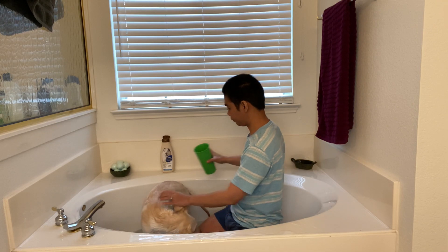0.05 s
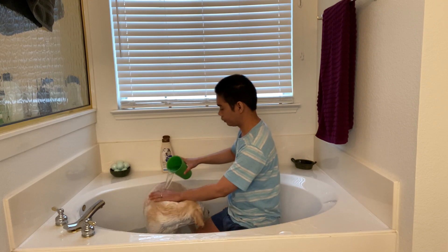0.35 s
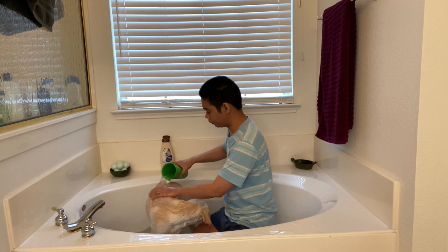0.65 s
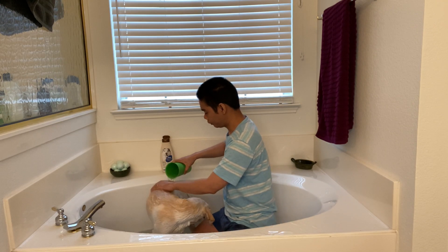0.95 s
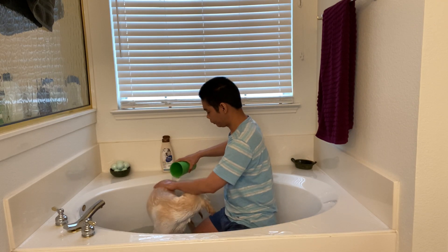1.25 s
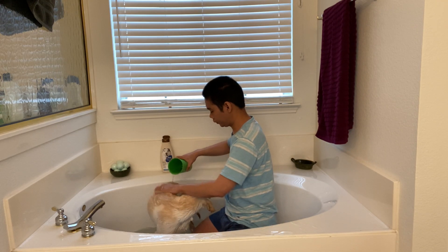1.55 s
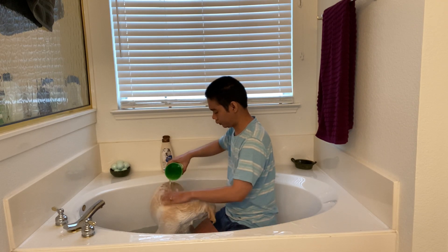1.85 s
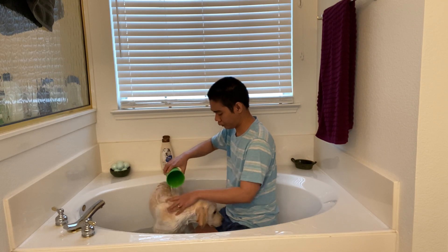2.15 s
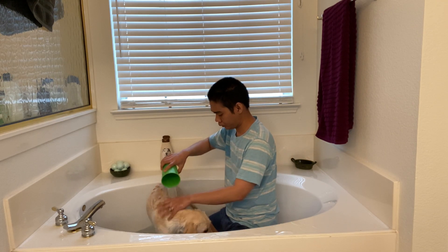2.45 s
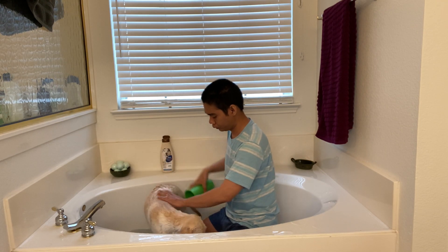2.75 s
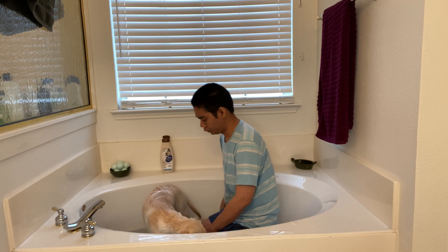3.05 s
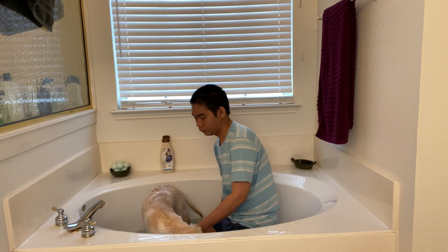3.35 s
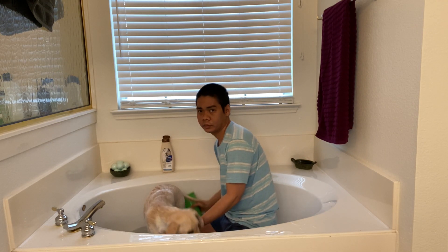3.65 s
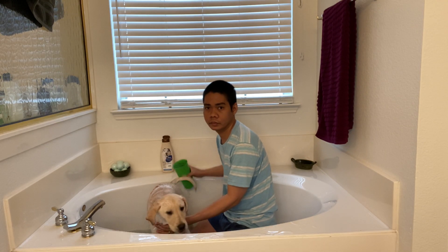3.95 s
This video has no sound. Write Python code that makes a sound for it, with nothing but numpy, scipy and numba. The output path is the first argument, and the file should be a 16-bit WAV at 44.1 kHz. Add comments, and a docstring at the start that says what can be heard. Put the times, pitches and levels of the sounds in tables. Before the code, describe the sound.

Water splashes off a dog and drips into a bathtub as a cup is emptied, then sloshes and gurgles as the cup is refilled. The hollow tub booms softly a few times, and the small bathroom echoes.

```python
"""In a small, hard-walled bathroom, a cup of water is poured over a dog in the tub.
Spray patters on the coat as tiny ticks, and the run-off drips into shallow water, where
trapped air rings as bubbles: the bigger the bubble, the lower its note. The hollow tub booms
softly when bumped. Later the cup is dipped in, gulps air and sloshes.
The walls echo the water sounds."""
import sys
import numpy as np
from scipy import signal
from scipy.fft import rfft, irfft
from scipy.io import wavfile
from numba import njit

SR = 44100
rng = np.random.default_rng(int(sys.argv[2]) if len(sys.argv) > 2 else 0)


def unload_audio(sound):
    """Save the sound as a 16-bit wav file, at the path given as the first command line argument."""
    columns = np.transpose(np.atleast_2d(sound))
    # keep every value between -1 and 1, then stretch to whole-number steps
    steps = np.round(np.clip(columns, -1, 1) * 32767)
    wavfile.write(sys.argv[1], SR, steps.astype(np.int16))


N = 176400


def undb(db):
    return 10 ** (np.asarray(db) / 20)


def unit_rms(x):
    return x / np.sqrt(np.mean(x ** 2) + 1e-20)


def follow(curve):
    """Loudness over time, from rows of t/s, level/dB."""
    return undb(np.interp(np.arange(N) / SR, *np.array(curve).T))


def at_pitch(hz, points):
    """Read between the rows of a table, on a musical (log) pitch scale."""
    p = np.array(points, float)
    return np.interp(np.log(hz + 1), np.log(p[:, 0]), p[:, 1])


def colour(x, points):
    """Shape a sound's bass and treble, then set its average strength to 1."""
    hz = np.arange(N // 2 + 1) * SR / N
    return unit_rms(irfft(rfft(x) * undb(at_pitch(hz, points)), N))


def add(out, start_s, x):
    """Mix a sound in at its start time."""
    i = int(np.clip(start_s * SR, 0, N - 1))
    out[i:i + len(x)] += x[:N - i]


# Spray as pouring starts, as the coat drains and as the cup dips: t/s, relative level/dB
SPRAY_POUR = [(0, -105), (.16, -62), (.168, -59), (.24, -68.5), (.402, -66.5), (.412, -48.5), (.54, -51),
              (.6, -52), (.66, -52.5), (.775, -62.5), (.786, -45.5), (.85, -44.5), (1.0, -47.5),
              (1.068, -58), (1.08, -45), (1.2, -46), (1.3, -54), (1.39, -54.5)]
SPRAY_DRAIN = [(1.4, -56), (1.44, -40.5), (1.63, -52), (1.65, -45.5), (1.98, -55.5), (2.266, -53.5),
               (2.296, -50), (2.388, -52.5), (2.602, -44.5), (2.72, -51.5)]
SPRAY_DIP = [(2.73, -45), (2.75, -37.5), (2.832, -39.5), (3.008, -58), (3.118, -43.5), (3.178, -52),
             (3.324, -50.5), (3.412, -42.5), (4.0, -49.5)]

def spray(spots=3, gain_db=-2):
    """The spray wanders between a few spots, each with its own echoes, so its tone keeps changing."""
    curve = list(SPRAY_POUR) + SPRAY_DRAIN + SPRAY_DIP
    flow = spurts(depth_db=1.5) * follow(curve) * undb(gain_db)
    shares = np.array([spurts(depth_db=5) for _ in range(spots)])
    shares /= np.linalg.norm(shares, axis=0)
    return sum(bathroom(patter() * flow * share) for share in shares)


# Tone of the spray, from low to high: f/Hz, relative level/dB
SPRAY_TONE = [(200, 0.5), (700, -14), (1500, 4.5), (2600, 3.5), (4200, 4.5), (5700, 6), (6500, 7.5),
              (7200, 5), (9000, 2.5), (11500, -7), (14500, -5)]

def patter(count=3000, scatter_db=5.5, mist_db=-10):
    """Droplets tick on one spot of coat or water, over the hiss of a fine mist."""
    when, side, chance = rng.random((count, 3)).T
    size = undb(scatter_db * np.minimum(-np.log(chance), 3.6))  # many soft, a few loud
    ticks = np.bincount((when * N).astype(int), np.sign(side - .5) * size, N)
    return colour(unit_rms(ticks) + undb(mist_db) * rng.standard_normal(N), SPRAY_TONE)


def spurts(depth_db, per_s=45):
    """Water comes in uneven spurts, so its loudness wanders quickly."""
    steps = rng.standard_normal(1000)
    return undb(depth_db * np.interp(np.arange(N) / SR * per_s, np.arange(len(steps)), steps))


@njit
def bubbles(start_s, hz, decay_s, size, length, glide=0.036):
    """Each bubble rings as a fading pure note whose pitch rises as it nears the surface."""
    out = np.zeros(length)
    for k in range(len(hz)):
        first, decay_samples = int(start_s[k] * SR), decay_s[k] * SR
        angle = 2 * np.pi * hz[k] / SR
        wave = size[k] + 0j
        step = np.exp(1j * angle - 1 / decay_samples)  # swings and fades the wave
        bend = np.exp(1j * angle * glide / decay_samples)  # nudges the pitch up
        for i in range(max(first, 0), min(length, first + int(6 * decay_samples))):
            out[i] += wave.imag
            wave *= step
            step *= bend
    return out


# Splashes in the bath: t/s, rise/s, decay/s, middle f/Hz, spread/octaves, relative level/dB
SPLASHES = [(0.411, 0.11, 0.073, 1600, 1.01, -56), (.63, 0.048, 0.087, 803, 0.83, -53.5),
            (.783, 0.0056, 0.063, 4000, 0.53, -52.5), (.8, 0.026, 0.15, 735, 0.47, -55),
            (.81, 0.059, 0.054, 2855, 0.13, -48.5), (1.078, 0.0059, 0.078, 3160, 0.17, -46.5),
            (1.106, 0.0028, .13, 1400, .2, -47.5), (1.18, 0.014, 0.039, 2810, 0.23, -43),
            (1.428, .015, 0.032, 4650, 0.22, -38.5), (1.448, 0.023, 0.083, 1704, 0.49, -38),
            (1.414, .11, 0.13, 300, 0.32, -36.5), (1.62, 0.073, 0.19, 2160, 0.57, -48),
            (1.53, 0.022, .2, 547, 0.39, -42.5), (1.875, 0.01, 0.092, 1140, 0.28, -42.5),
            (2.165, 0.0072, 0.023, 1300, 0.16, -42), (2.2, 0.09, 0.12, 1058, 0.28, -48),
            (2.468, 0.019, 0.072, 2580, 0.58, -44.5), (2.589, 0.021, 0.032, 2210, 0.72, -41.5),
            (2.786, 0.024, 0.06, 2430, 0.45, -35.5), (2.75, 0.078, 0.076, 224, 0.7, -47.5),
            (2.82, 0.017, 0.2, 800, 0.26, -46), (3.06, 0.031, 0.044, 3700, 0.27, -47),
            (3.217, 0.0055, 0.072, 775, 0.55, -39), (3.218, 0.0085, 0.082, 247.4, 0.47, -23.5),
            (3.372, 0.022, 0.069, 209, 0.46, -21.5), (3.37, 0.03, 0.07, 578, 0.45, -27.5),
            (3.375, 0.03, 0.078, 2840, 0.59, -41.5), (3.553, 0.012, 0.066, 204, 0.53, -26),
            (3.554, .08, 0.088, 387, 0.38, -27), (3.553, .025, .11, 780, 0.5, -32),
            (3.565, 0.027, .07, 2120, 0.202, -40.5), (3.88, 0.062, 0.17, 1139, 0.31, -43),
            (3.86, 0.042, 0.14, 427, 0.43, -44)]

def splashes(fewest=40, per_octave=260, scatter_db=5, cycles_at_1khz=4.2):
    """Each splash is a cloud of bubbles that swells and dies away; narrow clouds hold few and gurgle."""
    out = np.zeros(N)
    for start, rise, decay, middle_hz, spread, db in SPLASHES:
        count = int(fewest + per_octave * spread)
        jitter = rng.random(1000)[:count]
        pitch, strength = rng.standard_normal((1000, 2))[:count].T
        when = (np.arange(count) + jitter) / count * (rise + 4 * decay)
        hz = np.minimum(middle_hz * 2 ** (spread * pitch), SR / 3)
        swell = np.minimum(when / rise, np.exp((rise - when) / decay))
        size = undb(scatter_db * np.clip(strength, -2, 1.2)) * swell
        cycles = cycles_at_1khz * np.sqrt(hz / 1000)  # big bubbles ring for fewer cycles
        cloud = bubbles(when, hz, cycles / hz, size, SR)
        add(out, start, unit_rms(cloud) * np.sqrt((rise + decay) / 2) * undb(db))
    return out


# Big pockets of air: t/s, f/Hz, relative level/dB, decay/s
AIR_POCKETS = [(1.529, 293, -24, 0.0074), (1.595, 331, -32.5, 0.016), (1.547, 261, -17, 0.012),
               (1.642, 273, -27.5, .01), (3.181, 354, -30, 0.014), (3.196, 271.2, -23.5, 0.048),
               (3.223, 266.3, -12.5, 0.018), (3.295, 296, -30.5, 0.022), (3.388, 170, -14, 0.021),
               (3.465, 205, -21, 0.016), (3.622, 367, -18.5, 0.021), (3.655, 423.4, -23.5, 0.026),
               (3.705, 353, -24.5, 0.023), (3.77, 394, -26.5, 0.018)]

def gulps(rise_s=0.0041, glide=0.0394):
    """Air collapses under the stream or escapes from the cup with a short, low, rising note."""
    out, t = np.zeros(N), np.arange(SR // 3) / SR
    for start, hz, db, decay in AIR_POCKETS:
        note = np.sin(2 * np.pi * hz * t * (1 + glide * t / decay / 2))
        swell = (1 - np.exp(-t / rise_s)) * np.exp(-t / decay)
        add(out, start, undb(db) * note * swell)
    return out


# Water hitting cup and tub: t/s, middle f/Hz, relative level/dB
SLAPS = [(.168, 3270, -43), (0.41, 5930, -36.5), (0.646, 6300, -26), (1.009, 8640, -25.5),
         (1.076, 6540, -28), (1.153, 6300, -25.5), (1.297, 6100, -27.5), (1.204, 3120, -26.5),
         (2.33, 3260, -31), (2.569, 6800, -23.5), (2.746, 6430, -33), (2.809, 2600, -22),
         (3.219, 670, -26.5), (3.376, 680, -19.5), (3.493, 3000, -29), (3.746, 8350, -27)]

def slaps(decay_at_1khz_s=.0055):
    """Water slaps in a sharp burst of noise around one pitch; higher slaps are shorter."""
    out, t = np.zeros(N), np.arange(SR // 30) / SR
    for start, hz, db in SLAPS:
        band = signal.butter(1, [hz / 1.1, min(hz * 1.07, SR / 3)], "band", fs=SR)
        burst = unit_rms(signal.lfilter(*band, rng.standard_normal(len(t))))
        fade = np.exp(-t / decay_at_1khz_s * np.sqrt(hz / 1000))
        add(out, start, undb(db) / 2 * burst * fade)
    return out


# Heavy drops landing in the bath: t/s, f/Hz, level/dB
DROPS = [(0.243, 1090, -47.5), (1.108, 1255, -42), (1.153, 3200, -38.5), (1.881, 1223, -34.5),
         (2.085, 809, -41), (2.122, 788, -40), (2.169, 1339, -40), (2.29, 1420, -36.5), (2.342, 854, -38.5),
         (2.365, 1700, -35), (2.47, 853, -40.5), (2.534, 984, -41), (2.608, 2303, -34.5), (3.415, 910, -27),
         (3.404, 4270, -36), (3.585, 2236, -25), (3.954, 1220, -36)]

def drops(decay_cycles=15.9):
    """Each heavy drop makes one clear, ringing bubble."""
    start, hz, db = np.array(DROPS, float).T.copy()
    return bubbles(start, hz, decay_cycles / hz, undb(db), N)


# Flow of the trickle into the bath: t/s, relative level/dB
TRICKLE_FLOW = [(0, -100), (.2, -58.5), (.39, -62.5), (.45, -56.5), (.9, -56), (1.05, -72), (1.4, -59),
                (1.5, -37), (1.8, -53), (2.05, -55), (2.35, -47.5), (2.44, -53), (2.62, -44.5),
                (3.18, -49.5), (3.33, -38), (3.42, -32), (3.54, -38.5), (3.62, -34.5), (3.82, -44.5),
                (4, -48.5)]
# Tone of the trickle: f/Hz, relative level/dB
TRICKLE_TONE = [(100, -16), (250, -4), (450, -8.5), (850, 0.5), (1300, 1), (2000, 1), (3500, -13),
                (6000, -21.5)]

def trickle(count=3600, low_hz=220, high_hz=5000, decay_cycles=5.5, scatter_db=5, gain_db=-3):
    """Water running off the dog keeps making little bubbles of many pitches."""
    when, pitch, chance = rng.random((count, 3)).T
    hz = low_hz + (high_hz - low_hz) * pitch ** 2
    size = undb(scatter_db * np.minimum(-np.log(chance), 3)) * (hz / high_hz) ** .75
    babble = bubbles(when * N / SR, hz, decay_cycles / hz, size, N)
    return colour(babble, TRICKLE_TONE) * follow(TRICKLE_FLOW) * undb(gain_db)


# Soft bumps against the tub: t/s, relative level/dB
BUMPS = [(0.396, -38.5), (.459, -39.5), (2.822, -44.5), (3.603, -43.5)]
# The tub's own low notes: f/Hz, relative level/dB, fade/s (time to fall by 60 dB)
TUB_NOTES = [(64.2, 6.5, 0.36), (104.4, -8.5, 0.58)]

def bumps(rise_s=0.006):
    """The hollow tub booms when a paw or knee pushes it."""
    out, t = np.zeros(N), np.arange(SR) / SR
    boom = sum(undb(db - 60 * t / fade_s) * np.sin(2 * np.pi * hz * t) for hz, db, fade_s in TUB_NOTES)
    for start, db in BUMPS:
        add(out, start, -undb(db) * boom * (1 - np.exp(-t / rise_s)))
    return out


# Echoes off the bathroom walls: f/Hz, relative level/dB, fade/s (time to fall by 60 dB)
WALL_ECHOES = [(60, -33, .45), (155, -16.5, 0.64), (338, -8, 0.55), (650, 0.5, 1), (1470, -0.5, 0.89),
               (4000, 2.5, 0.99), (8700, 1.5, 0.41), (15100, 2.5, 0.09)]

def bathroom(x, echo_db=0, first_echo_s=0.0013, tub_fade_s=0.11, right_lag_s=.00029):
    """Sound reaches the left ear first; tub and walls then send each ear its own blur of echoes."""
    t = np.arange(SR * 3 // 4) / SR
    hz = np.arange(len(t) // 2 + 1) * SR / len(t)
    noise, response = rfft(rng.standard_normal((2, len(t)))), 0
    for k, (_, db, wall_fade_s) in enumerate(WALL_ECHOES):
        band = at_pitch(hz, [(row[0], j == k) for j, row in enumerate(WALL_ECHOES)])
        walls = unit_rms(undb(-60 * t / wall_fade_s) * (t > first_echo_s))
        tub = unit_rms(undb(-60 * t / tub_fade_s) * (t > first_echo_s))
        fade = np.hypot(walls, tub) / np.sqrt(len(t))
        response = response + undb(db + echo_db) * fade * irfft(noise * band, len(t))
    response[0, 0] += 1  # the straight path to each ear
    response[1, int(right_lag_s * SR)] += 1
    return signal.fftconvolve(x[None], response, axes=1)[:, :N]


# Tone of the quiet room: f/Hz, relative level/dB
BACKGROUND_TONE = [(20, -8), (62, 17), (110, -1), (300, -0.5), (1000, -14.5), (6000, -15), (15000, -18)]

def background(level_db=-66.5):
    """A faint, steady rumble and hiss, different in each ear."""
    return undb(level_db) * np.array([colour(rng.standard_normal(N), BACKGROUND_TONE) for _ in range(2)])


def scene(water_low_hz=79):
    """The water sounds come from different spots in the tub, each spot with its own echoes."""
    water = spray()
    water += bathroom(slaps(), echo_db=-3.5)  # slaps stand out from their echoes
    water += bathroom(trickle())
    water += bathroom(splashes() + drops())
    water += bathroom(gulps(), echo_db=1.5)
    low_cut = signal.butter(2, water_low_hz, "high", fs=SR, output="sos")
    lean_right = undb([[-1.1], [1.1]])
    return signal.sosfilt(low_cut, water) + bumps() * lean_right + background()


def record(dry, notch_hz=(9850, 11000), top_hz=14450):
    """Cut a narrow gap in the treble and take off the very top."""
    notch = signal.ellip(5, .5, 40, notch_hz, "bandstop", fs=SR, output="sos")
    top_cut = signal.ellip(8, .2, 70, top_hz, fs=SR, output="sos")
    return signal.sosfilt(top_cut, signal.sosfilt(notch, dry))


dry = scene()
out = record(dry)
unload_audio(out)
```